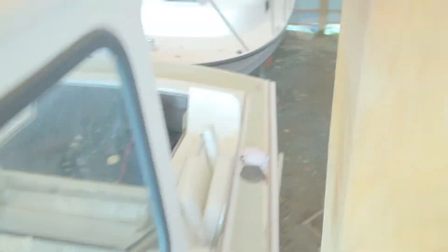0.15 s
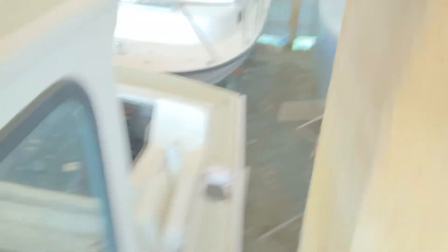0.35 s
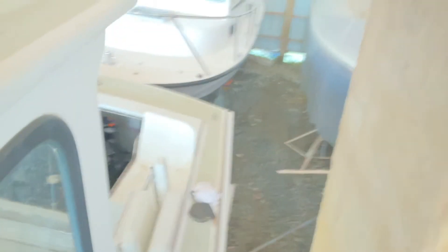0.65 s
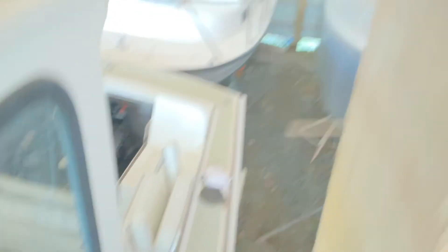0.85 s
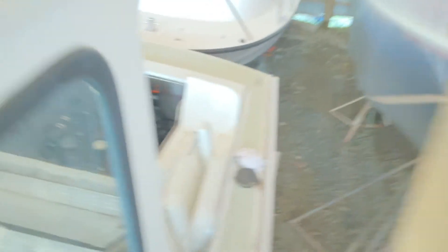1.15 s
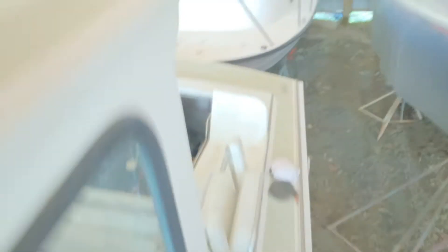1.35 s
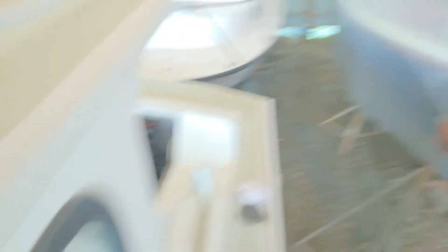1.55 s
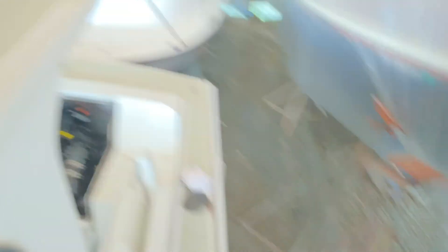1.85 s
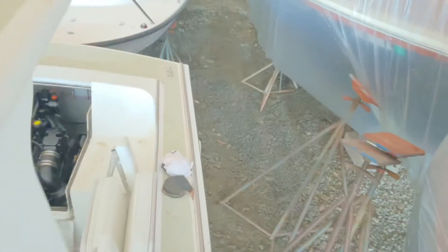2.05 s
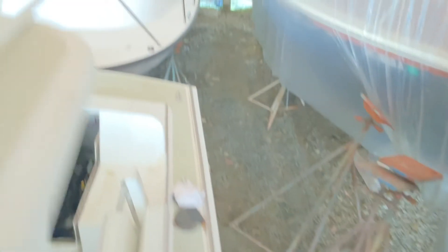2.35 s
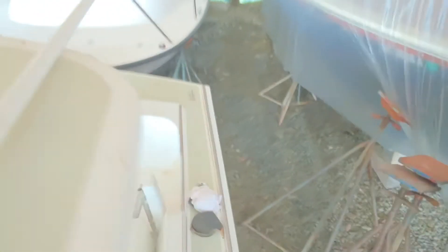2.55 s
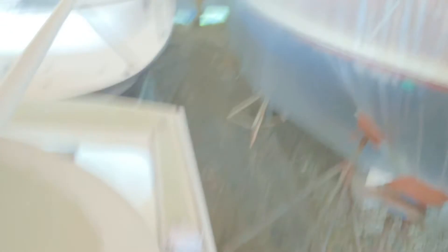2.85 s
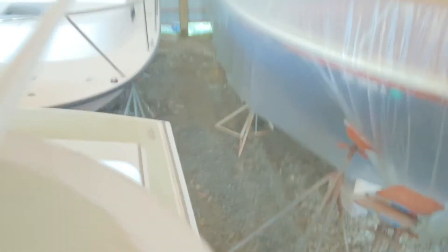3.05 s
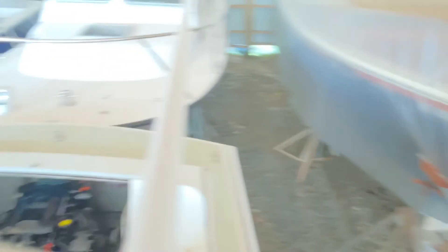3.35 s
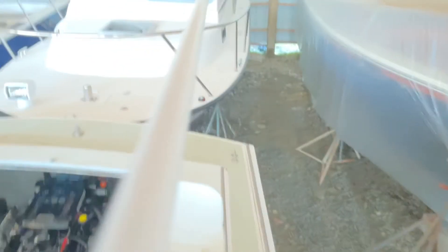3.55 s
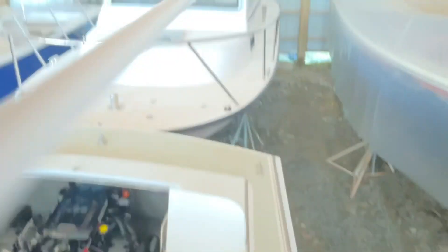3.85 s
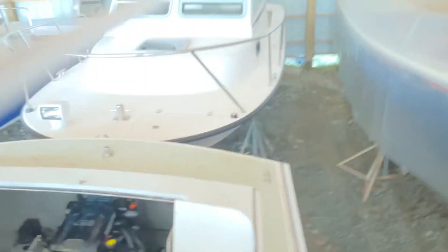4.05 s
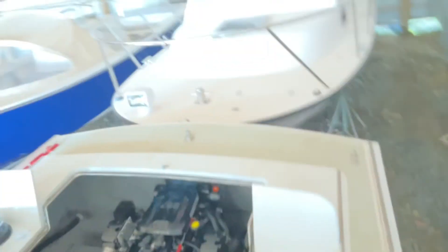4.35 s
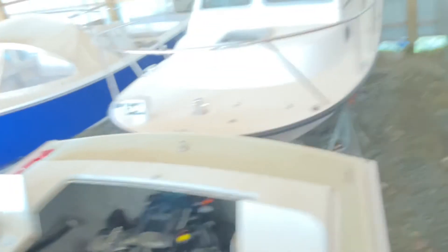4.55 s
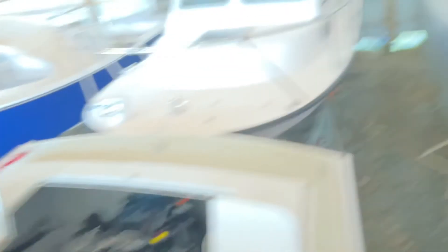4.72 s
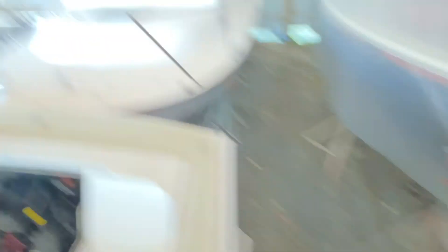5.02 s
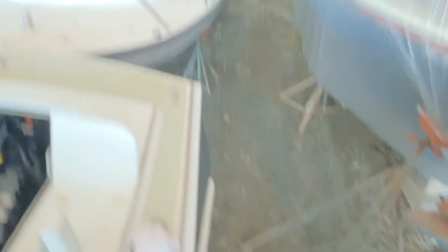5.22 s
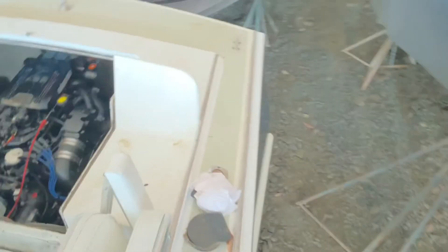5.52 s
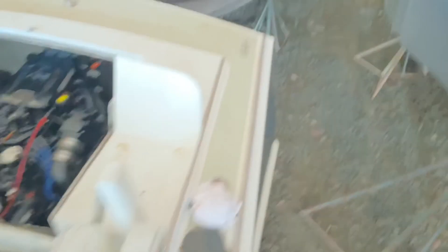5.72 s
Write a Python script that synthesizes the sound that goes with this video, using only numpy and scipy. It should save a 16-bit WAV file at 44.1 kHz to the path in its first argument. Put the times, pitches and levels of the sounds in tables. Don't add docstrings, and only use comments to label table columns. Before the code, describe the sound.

Irregular hollow knocks and scuffing soles on a fibreglass boat deck, with one booming landing near four seconds, inside a faintly humming shed.

```python
import sys
import numpy as np
from scipy import signal
from scipy.fft import rfft, irfft, next_fast_len
from scipy.io import wavfile
from scipy.ndimage import uniform_filter1d, map_coordinates

SR = 44100
rng = np.random.default_rng(int(sys.argv[2]) if len(sys.argv) > 2 else 0)


def elevation(decibels):
    levels = np.asarray(decibels, float)
    return 10 ** (levels / 20)


def materialize(psi):
    bounded = np.clip(np.atleast_2d(psi).T, -1, 1)
    quanta = np.round(bounded * 32767).astype(np.int16)
    wavfile.write(sys.argv[1], SR, quanta)


N = 259308
TOP_HZ = 15820
CONTACT_DELAY_S = 0.001146


def unit(x):
    return x / np.sqrt(np.mean(x ** 2) + 1e-20)


def along(points, hz):
    f, v = np.transpose(points)
    return np.interp(np.log(hz + 1), np.log(f + 1), v)


def curves(rows):
    s, *cols = np.transpose(rows)
    return [np.interp(np.arange(N) / SR, s, c) for c in cols]


def wobble(rate):
    knots = rng.standard_normal(int(N * 400 / SR) + 4)
    return map_coordinates(knots, [np.arange(N) * rate / SR])


def filtered(x, response):
    m = next_fast_len(len(x) + 8192)
    return irfft(rfft(x, m) * response(np.fft.rfftfreq(m, 1 / SR)), m)[:len(x)]


def rush(spectrum, patchy_db, grain_db):
    z = signal.stft(rng.standard_normal(N), nperseg=512)[2]
    field = uniform_filter1d(rng.standard_normal(z.shape), size=6, axis=0)
    field = uniform_filter1d(field, size=8, axis=1)
    x = signal.istft(z * elevation(patchy_db * unit(field)), nperseg=512)[1][:N]
    grainy = x * elevation(grain_db * wobble(150))
    return unit(filtered(grainy, lambda hz: elevation(along(spectrum, hz))))


def fade(t, t60, attack):
    return elevation(-60 * t / t60) * (1 - np.exp(-t / attack))


def burst(t, low_hz, high_hz, t60, order=2):
    band = signal.butter(order, [low_hz, min(high_hz, TOP_HZ)], "bandpass", fs=SR, output="sos")
    x = signal.sosfilt(band, rng.standard_normal(len(t)) * fade(t, t60, 0.00029))
    return x / np.abs(x).max()


def add(track, s, x):
    track[round((s + CONTACT_DELAY_S) * SR):][:len(x)] += x


def still_air():
    # (frequency [Hz], density [dB per Hz])
    air = [(18, -44.5), (30, -15), (64, -6.5), (103, -9.5), (153, 3), (328, -3.5), (426, 1), (801, -20.5),
           (2350, -14), (2680, -20.5), (8980, -39), (14400, -30.5), (16000, -36)]
    # (frequency [Hz], line width [Hz], level [dB])
    hum = [(62.8, 2.7, -65), (147.4, 3.3, -73.5), (427, 3.3, -79.5)]
    # (time [s], level [dB])
    swelling = [(0.0, -81), (0.72, -61), (0.8, -67), (1.24, -72.5), (1.67, -71), (1.8, -69.5), (2.78, -65),
                (2.9, -52), (3.08, -80), (3.91, -69), (4.13, -63.5), (4.45, -71), (4.65, -62),
                (5.06, -70.5), (5.88, -77)]
    lines = []
    for hz, width, db in hum:
        drift = elevation(db + 1.2 * wobble(2.98))
        line = filtered(rng.standard_normal(N), lambda f: 1 / (1 + ((f - hz) / width) ** 2))
        lines.append(drift * unit(line))
    swell = elevation(curves(swelling)[0] - hum[0][2] + 2.5)
    return swell * lines[0] + sum(lines[1:]) + elevation(-66) * rush(air, patchy_db=1.56, grain_db=1.2)


def strokes(jolts, drags, sways):
    sudden = 0.012
    t, power = np.arange(0, N, 32) / SR, 0
    for rows, slow_rise, slow_fall in ((jolts, False, True), (drags, True, False), (sways, True, True)):
        s, span, *levels = np.transpose(rows)[:, :, None]
        rise = span if slow_rise else sudden
        fall = span if slow_fall else sudden
        under_db = 20 * np.where(t < s, (s - t) / rise, (t - s) / fall)
        power = power + np.sum(elevation(np.array(levels) - under_db) ** 2, axis=1)
    return [np.interp(np.arange(N) / SR, t, np.sqrt(p)) for p in power]


def rubbing():
    # (time [s], time to change 20 dB [s], sole hiss [dB], cloth rustle [dB])
    jolts = [(.002, .9, -68, -72.5), (.395, 0.13, -65, -58), (.53, .06, -60, -62), (.565, 0.08, -50, -75),
             (1.07, 0.95, -64, -74), (1.275, 0.03, -57.5, -64), (2.478, 0.2, -58, -63.5),
             (2.855, .13, -50.5, -59), (3.01, 0.3, -58.5, -67.5), (3.14, 0.7, -62, -67),
             (3.296, 0.27, -60, -60), (4.112, 0.22, -42.5, -47), (4.545, .06, -56, -57),
             (4.59, .2, -59.5, -70), (4.99, .07, -70, -67), (5.262, 0.34, -60, -68), (5.553, .1, -60, -59),
             (5.6, .7, -67, -70)]
    drags = [
        (.492, 0.13, -62, -68),
        (.95, 1.7, -70.5, -74),
        (2.45, 1.3, -71, -98),
        (4.85, 0.3, -51, -59.5),
        (5.09, .8, -66, -67.5),
    ]
    sways = [(.218, 0.041, -62, -74), (1.544, 0.28, -58.5, -64.5), (2.72, .25, -58, -65),
             (2.796, 0.1, -57, -67), (2.94, .3, -63, -72), (3.365, .25, -52.5, -70),
             (3.44, 0.2, -50.5, -65), (3.7, 0.26, -56.5, -66), (3.918, .38, -51.5, -61.5),
             (4.46, 0.31, -55.5, -63), (4.745, .2, -61, -63), (5.17, .7, -71, -82), (5.866, .03, -71, -68)]
    # (frequency [Hz], density [dB per Hz])
    hiss = [(760, -30.5), (1300, -13), (1920, -6.5), (3410, -6), (5320, -9), (9000, -24), (11700, -68.5),
            (19800, -120)]
    rustle = [(4410, -26.5), (7500, -1.5), (9450, -7.5), (13600, 2.5), (15650, 4), (16000, -10)]
    sole_gain, cloth_gain = strokes(jolts, drags, sways)
    sole = sole_gain * elevation(-3) * rush(hiss, patchy_db=1.4, grain_db=0.65)
    return sole + cloth_gain * elevation(-0.7) * rush(rustle, patchy_db=2.7, grain_db=1.2)


def shifting_feet():
    # (time [s], time to change 20 dB [s], hull rumble [dB], deck scuff [dB])
    jolts = [(.02, 0.4, -63, -64), (.58, 0.36, -54, -41.5), (1.04, .5, -58.5, -62.5), (1.27, 0.5, -49, -65),
             (2.0, 0.9, -64, -72), (2.488, 0.16, -47, -51), (2.85, 0.43, -48, -54.5),
             (3.026, .3, -50.5, -52.5), (3.33, .6, -51.5, -50), (3.682, 0.26, -59.5, -46.5),
             (4.11, 0.32, -40, -43), (4.165, 0.0154, -26, -52.5), (4.6, 0.15, -46, -39),
             (4.67, 0.5, -48.5, -51.5), (5.57, 0.06, -42.5, -50), (5.61, 0.45, -57, -61.5)]
    drags = [
        (.47, 0.19, -59, -56.5),
        (.93, 1.1, -62, -65),
        (3.29, 0.41, -56, -55),
        (4.521, 1.2, -63, -54),
    ]
    sways = [
        (1.516, 0.48, -53.5, -52.5),
        (2.624, 0.39, -61, -54.5),
        (2.99, .09, -41.5, -57),
        (3.36, .2, -55, -46),
        (3.44, .15, -53, -47),
        (3.9, 0.99, -63, -54),
        (5.12, 0.07, -58, -76),
        (5.305, 0.067, -62, -55),
        (5.36, .25, -56, -62),
    ]
    # (frequency [Hz], density [dB per Hz])
    hull = [(18, -44.5), (30, -20), (46, -11.5), (70, -1.5), (178, -5.5), (260, -18.5), (340, -47),
            (570, -120)]
    deck = [(120, -37), (200, 0), (644, 1.5), (782, -0.5), (1440, -4.5), (2600, -14.5), (3380, -43),
            (5720, -120)]
    weight, slide = strokes(jolts, drags, sways)
    rumble = weight * elevation(-6) * rush(hull, patchy_db=1.5, grain_db=1.6)
    return rumble + slide * elevation(-3) * rush(deck, patchy_db=1.0, grain_db=1.53)


def rattle():
    # (time [s], peak [dB], T60 [s])
    case_taps = [(0.398, -42, 0.005), (3.1383, -55, 0.0042), (3.302, -45, 0.005), (3.3114, -47, 0.006),
                 (3.7207, -46, 0.0024), (3.7344, -48, 0.0054), (3.7514, -52.5, 0.0043),
                 (4.1004, -18, 0.0055), (4.1018, -9.5, 0.0027), (4.1037, -11, 0.012),
                 (4.5373, -26.5, 0.005), (4.5407, -28.5, 0.0043), (4.581, -33, 0.007),
                 (4.586, -31.5, 0.005), (4.994, -50.5, 0.0036), (5.5513, -51, 0.0058),
                 (5.8656, -58.5, 0.0039)]
    out, t = np.zeros(N + SR), np.arange(SR // 40) / SR
    for s, db, t60 in case_taps:
        add(out, s - CONTACT_DELAY_S, elevation(db) * burst(t, 10030, TOP_HZ, t60, order=5))
    return out[:N]


def rubs():
    # (time [s], length [s], frequency [Hz], level [dB])
    creaks = [
        (1.065, 0.052, 2250, -62.5),
        (1.27, 0.024, 2180, -56.5),
        (1.266, 0.018, 2750, -58.5),
        (2.772, 0.024, 4000, -59),
        (2.841, 0.026, 3100, -57),
    ]
    out = np.zeros(N + SR)
    for s, length, hz, db in creaks:
        t = np.arange(round(length * SR)) / SR
        drift = unit(uniform_filter1d(rng.standard_normal(len(t)), size=90))
        pitch = hz * (1 + 1.4 * (t - length / 2) + 0.048 * drift)
        phase = 2 * np.pi * np.cumsum(pitch) / SR
        add(out, s, elevation(db + 2.5) * np.sin(np.pi * t / length) ** 0.71 * np.sin(phase))
    return out[:N]


def taps():
    # (time [s], peak [dB], frequency [Hz], T60 [s], rise [s])
    touches = [(.526, -40, 610, .05, .004), (.533, -34.5, 2800, .04, .004), (.535, -33, 3260, .04, .004),
               (.537, -30, 996, .06, .003), (.536, -40, 7130, .04, .002), (.541, -29, 470, .05, .004),
               (.557, -31, 480, .03, .003), (.573, -37, 450, .06, .004), (1.2645, -42, 400, .03, .0006),
               (2.1605, -56, 1700, .012, .0004), (2.4635, -39, 520, .022, .0006),
               (2.4635, -49, 1500, .012, .0004), (2.839, -45, 3000, .02, .0005),
               (2.863, -50, 2750, .03, .002), (3.292, -42, 480, .08, .006), (3.306, -45, 330, .07, .004),
               (3.352, -48, 1300, .06, .005), (3.4315, -38, 1250, .02, .001), (3.442, -43, 1500, .03, .003),
               (3.432, -43, 1750, .03, .001), (3.604, -43, 1200, .012, .0004),
               (3.6765, -36, 850, .01, .0004), (4.098, -21, 410, .06, .001), (5.259, -49, 560, .03, .0008),
               (5.259, -50, 1850, .02, .0005), (5.28, -46, 2350, .02, .0005), (5.28, -47, 620, .02, .0008),
               (5.293, -45, 640, .03, .001), (5.293, -48, 1780, .025, .0006),
               (5.553, -46, 2050, .02, .0005), (5.553, -45, 1150, .025, .0005),
               (5.555, -46, 380, .05, .001), (5.572, -47, 300, .06, .003), (5.585, -48, 430, .06, .003),
               (5.64, -61, 520, .3, .01)]
    out, t = np.zeros(N + SR), np.arange(SR // 3) / SR
    settling = t + .0004 * (1 - np.exp(-t / .006))
    for s, db, hz, t60, rise in touches:
        swell = fade(t, t60, rise)
        add(out, s, elevation(db) * swell / swell.max() * np.sin(2 * np.pi * hz * settling))
    return out[:N]


def ticks():
    # (time [s], peak [dB], frequency [Hz], cycles to fall 60 dB [count], splash [dB])
    edge_hits = [(0.2153, -51, 3810, 23, -22), (0.485, -52, 2250, 22, -21), (0.6526, -37, 2600, 9, -22),
                 (1.4698, -41, 2000, 8, -24), (2.0955, -47, 1690, 4, -26), (2.161, -47, 2000, 4, -28),
                 (3.0111, -35.5, 2300, 19, -2), (3.6045, -35, 1500, 4.5, -22), (3.6772, -30, 1500, 6, -27),
                 (3.7197, -35.5, 2160, 14.5, -20), (4.095, -4.5, 1500, 8, -20.5),
                 (4.135, -20, 1150, 5, -24), (4.1928, -37, 1200, 9, -14), (4.2185, -33, 1620, 7.5, -10.5),
                 (4.534, -27, 2000, 10, -16), (4.5805, -25, 2130, 14, -13),
                 (4.8504, -30.5, 2760, 18, -15.5), (4.8565, -29.5, 5000, 12, -12),
                 (5.26, -47, 1303, 8, -17), (5.6068, -42, 1500, 6, -11), (5.8646, -54, 1200, 19.5, -5.5)]
    out, t = np.zeros(N + SR), np.arange(SR // 20) / SR
    for s, db, hz, cycles, splash_db in edge_hits:
        ring = np.sin(2 * np.pi * hz * t) * fade(t, cycles / hz, 0.00023)
        smear = .5 * burst(t, hz * 0.65, hz * 1.3, cycles / hz)
        splash = elevation(splash_db) * burst(t, 4900, TOP_HZ, 0.0017)
        add(out, s, elevation(db) * (ring + smear + splash))
    return out[:N]


def squeak(rows, colour, jitter, rough):
    rate, db = curves(rows)
    cycles = np.cumsum(rate * (1 + jitter * wobble(90))) / SR
    slips = np.diff(np.floor(cycles), prepend=0) * elevation(1.8 * wobble(300))
    gain = lambda hz: elevation(along(colour, hz)) * np.exp(3j * np.log(hz + 100))
    tone = unit(filtered(slips - slips.mean(), gain))
    noise = unit(filtered(rng.standard_normal(N), gain))
    inside = (np.arange(N) > rows[0][0] * SR) & (np.arange(N) < rows[-1][0] * SR)
    return elevation(db) * inside * (tone + rough * noise)


def sole_squeal():
    # (time [s], slip rate [Hz], level [dB])
    slipping = [
        (4.68, 1000, -73),
        (4.72, 1000, -60.5),
        (4.8, 1000, -65),
        (4.85, 1000, -55),
        (4.87, 1018, -54),
    ]
    # (frequency [Hz], density [dB per Hz])
    colour = [(530, -25), (900, 1), (1960, -2), (3150, 7.5), (3530, 2), (5150, 4), (9000, -11),
              (11700, -47), (19800, -120)]
    return squeak(slipping, colour, jitter=.02, rough=0.6)


def board(x):
    # (frequency [Hz], width [Hz], level [dB])
    resonances = [(420, 19, 3.5), (444, 8, 0), (482.6, 22, -2), (583, 27, 2.5), (927, 20, -8.5),
                  (1407, 35, -13), (1870, 58, -10)]

    def response(f):
        total = 0
        for k, (centre, width, db) in enumerate(resonances):
            damping = 1j * f * width
            total = total + (-1) ** k * elevation(db) * damping / (centre * centre - f * f + damping)
        return total
    return filtered(x, response)


def heel_twist():
    # (time [s], slip rate [Hz], level [dB])
    slipping = [
        (.522, 490, -64),
        (.533, 485, -45.5),
        (.541, 468, -30),
        (.549, 452, -32),
        (.563, 440, -60),
    ]
    # (frequency [Hz], density [dB per Hz])
    colour = [(220, -40), (380, 1), (1520, 2.5), (2000, -0.5), (3000, 4), (3950, -4), (4560, -11.5),
              (7240, -16), (7560, -21.5), (8990, -31), (12000, -33), (15600, -60), (22000, -120)]
    chirp = squeak(slipping, colour, jitter=.015, rough=1.1)
    return chirp + elevation(10.5) * board(chirp)


def struck(hits, modes):
    out, t = np.zeros(N + SR), np.arange(SR // 3) / SR
    hz, level, t60 = np.transpose(modes)[:, :, None]
    for s, db, bright_db, bend in hits:
        strength = elevation(db + level + bright_db * np.log2(hz / hz[0]))
        ring = strength * fade(t, t60, .0003) * np.sin(2 * np.pi * bend * hz * t)
        add(out, s, ring.sum(axis=0))
    return out[:N]


def hatch_lid():
    # (frequency [Hz], level [dB], T60 [s])
    lid = [(285, -10, .15), (447, 0, .06), (724, -13, .06), (920, -5, .07), (1010, -12, .05),
           (1250, -9, .025), (1448, -16, .04), (2035, -5, .022), (2240, -11, .025), (2700, -13, .018),
           (3500, -14, .012)]
    # (time [s], level [dB], brightness [dB per octave], pitch factor under the load [ratio])
    hits = [
        (4.534, -26.5, 0, 1.0),
        (4.552, -41, 2, .9),
        (4.5605, -43, 1, .84),
        (4.58, -32, 2, 1.03),
        (4.595, -42, 2, 1.07),
        (4.6, -38, 1, 1.1),
        (4.616, -41, 1.5, 1.05),
        (4.648, -49, 2, 1.01),
    ]
    return struck(hits, lid)


def cockpit_floor():
    # (frequency [Hz], level [dB], T60 [s])
    floor = [(253, 0, .085), (428, -14, .06), (624, -6, .06), (880, -7, .035), (1168, -18, .05),
             (1412, -10, .025), (1768, -11, .03), (2288, -17, .035), (2840, -24, .03)]
    # (time [s], level [dB], brightness [dB per octave], pitch factor under the load [ratio])
    hits = [
        (4.096, -15.5, 0, 1.0),
        (4.1145, -44, 6, .97),
        (4.1362, -27, 0, .96),
        (4.192, -42, 4, .92),
    ]
    return struck(hits, floor)


def thuds():
    # (time [s], peak [dB], frequency [Hz], T60 [s])
    loads = [(0.484, -38.5, 204, 0.18), (1.263, -39, 211, 0.12), (2.461, -46, 153, 0.13),
             (2.787, -31, 62.6, 0.18), (2.861, -40, 99, 0.18), (2.921, -36, 65, 0.13),
             (2.962, -42, 81, 0.26), (3.301, -46, 112, 0.28), (3.332, -42, 80, 0.29),
             (4.096, -23, 249, 0.13), (4.098, -19, 129, 0.25), (4.1, -23, 69.3, 0.26),
             (4.134, -27, 129, 0.18), (4.16, -27, 63.6, 0.23), (4.535, -32, 148.4, 0.22),
             (4.541, -35, 65.2, 0.38), (4.579, -33, 149.4, 0.31), (5.309, -48.5, 129, 0.37),
             (5.562, -49, 223, 0.12), (5.604, -42.5, 83.4, .44)]
    out, t = np.zeros(N + SR), np.arange(SR // 2) / SR
    sagging = t + 0.00065 * (1 - np.exp(-t / 0.013))
    for s, db, hz, t60 in loads:
        swing = np.sin(2 * np.pi * hz * sagging) * fade(t, t60, .45 / hz)
        shudder = 0.35 * burst(t, hz * 0.93, hz * 1.6, t60 * 1.1)
        add(out, s, elevation(db) * (swing + shudder))
    return out[:N]


def knocks():
    # (time [s], peak [dB], contact pitch [Hz], crack [dB], T60 [s])
    contacts = [(0.4855, -25.5, 370, -14.5, 0.022), (0.651, -30, 750, -38, 0.06),
                (1.265, -37.5, 420, -20, 0.07), (1.323, -36.5, 524, -20, 0.07),
                (1.527, -42, 396, -37, 0.11), (1.588, -40.5, 304, -25, 0.097),
                (1.675, -45.5, 304, -26, 0.073), (1.749, -44, 243, -20, 0.079), (2, -47.5, 435, -40, 0.18),
                (2.4635, -39, 482, -18, 0.04), (3.295, -46, 427, -32, 0.07), (3.432, -34, 1350, -20, 0.1),
                (3.657, -36.5, 762, -15.5, 0.095), (3.685, -28.5, 641, -19.5, 0.066),
                (4.0935, -7.5, 277, -15, 0.051), (4.133, -18.5, 267, -19, 0.047),
                (4.219, -31, 416, 1.5, 0.048), (4.5335, -27, 427, -8, 0.051), (4.579, -30, 450, -5, 0.043),
                (4.597, -38, 450, -21, 0.065), (5.2805, -42, 650, -11, 0.035), (5.293, -42, 640, -14, 0.04),
                (5.5525, -37, 480, -12, 0.06)]
    # (frequency [Hz], level [dB], T60 [s])
    deck = [(129, -1.5, 0.41), (257.7, -11.5, 0.19), (431, 2.5, 0.22), (577.5, -26, 0.31), (911, 0.5, 0.17),
            (1075, -16, 0.34), (1364, 1.5, 0.067), (1750, -10.5, 0.09), (1828, -13, 0.2),
            (2067, -17.5, 0.81), (2290, -17, 0.33)]
    out, t = np.zeros(N + SR), np.arange(SR // 4) / SR
    hz, level, ring = np.transpose(deck)[:, :, None]
    for s, db, pitch, crack_db, t60 in contacts:
        near_db = -7 * np.abs(np.log2(hz / pitch)) + .5 * level + rng.normal(0, 1.1, hz.shape)
        ring_s = ring * t60 * 8 * np.minimum(1, 700 / hz)
        modes = np.sum(elevation(near_db) * fade(t, ring_s, 0.0004) * np.sin(2 * np.pi * hz * t), axis=0)
        blow = np.clip((db + 48) / 42, 0, 1)
        lead = 1.3 / pitch * blow * (1 - np.exp(-t / 0.00094))
        contact = np.sin(2 * np.pi * pitch * (t + lead)) * fade(t, t60 * 0.53, 0.0008)
        thump = burst(t, pitch * .6, pitch * 1.8, t60)
        body = 0.53 * contact + 0.31 * modes / np.abs(modes).max() + 0.45 * thump
        crack = elevation(crack_db - 2) * burst(t, 1300, 5000, t60 * 0.39)
        case_tick = elevation(crack_db - 11.5) * burst(t, 10500, TOP_HZ, t60 * 0.19)
        add(out, s + .0012 * blow ** 2, elevation(db) * (body + crack + case_tick))
    return out[:N]


def shed(x, t60s, delay):
    hz, t, z = signal.stft(rng.standard_normal(SR), SR, nperseg=256)
    tail = signal.istft(z * elevation(-60 * t / along(t60s, hz)[:, None]), SR, nperseg=256)[1]
    late = np.pad(x, (round(delay * SR), 0))
    return signal.fftconvolve(late, tail / np.linalg.norm(tail))[:N]


def reflections(heel, steps):
    # (frequency [Hz], T60 [s])
    near_decay = [(100, 0.23), (500, 0.51), (2000, 0.47), (8000, 0.38)]
    far_decay = [(100, 0.93), (450, 1.6), (1900, 1.1), (2800, 0.62), (8000, 0.8)]
    near = elevation(-12.5) * shed(heel + steps, near_decay, delay=.007)
    return near + shed(elevation(-14) * heel + elevation(-25.5) * steps, far_decay, delay=.025)


def scene():
    heel = heel_twist()
    steps = knocks() + ticks() + rubs() + thuds() + sole_squeal()
    steps = steps + hatch_lid() + cockpit_floor() + taps()
    at_camera = rattle() + rubbing() + shifting_feet() + still_air()
    return (heel + steps + reflections(heel, steps) + at_camera)[None]


def band_limit(x):
    return signal.sosfilt(signal.butter(12, 16650, fs=SR, output="sos"), x)


def record(dry):
    bass_cut = signal.butter(6, 46, "highpass", fs=SR, output="sos")
    x = signal.sosfilt(bass_cut, dry[0])
    x = filtered(x, lambda hz: np.clip((TOP_HZ - hz) / 150 + .5, 0, 1))
    return band_limit(x[None])


dry = scene()
out = record(dry)
materialize(out)
```